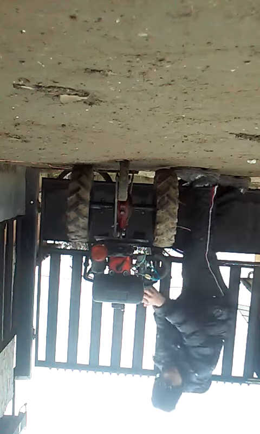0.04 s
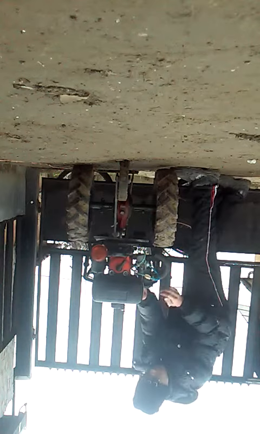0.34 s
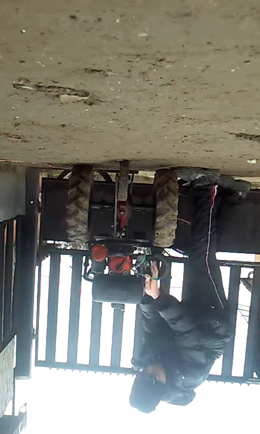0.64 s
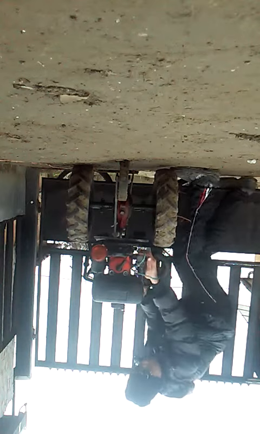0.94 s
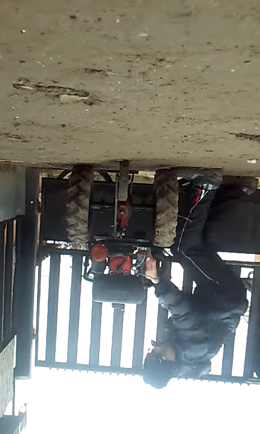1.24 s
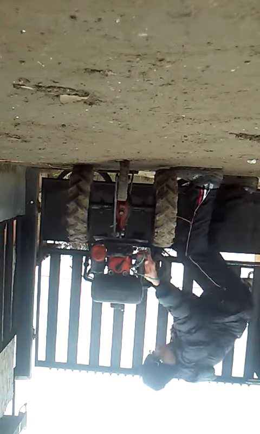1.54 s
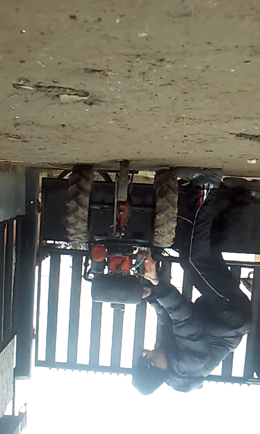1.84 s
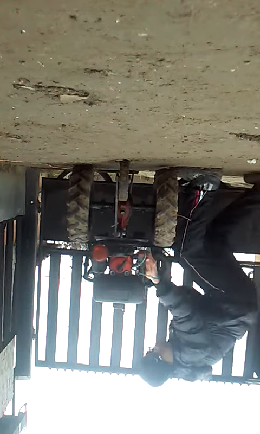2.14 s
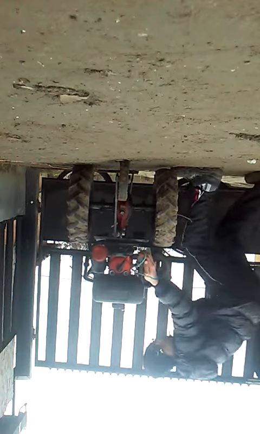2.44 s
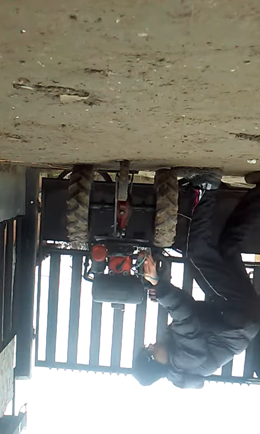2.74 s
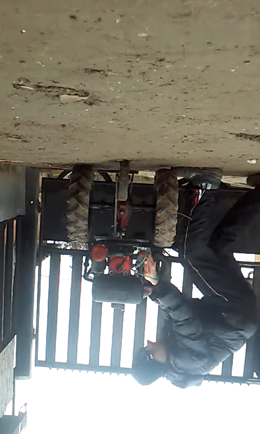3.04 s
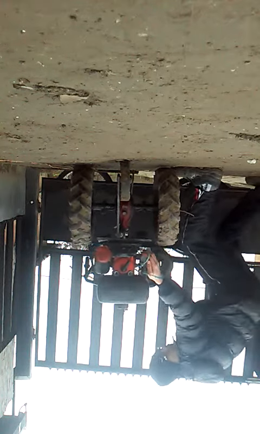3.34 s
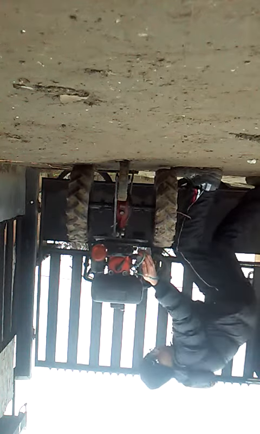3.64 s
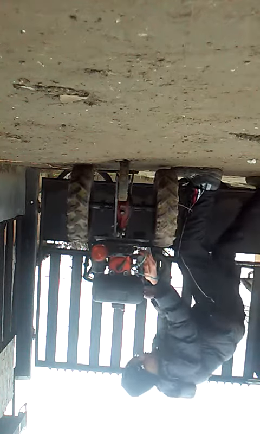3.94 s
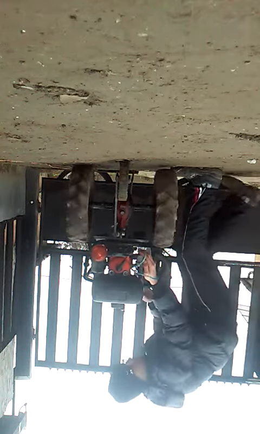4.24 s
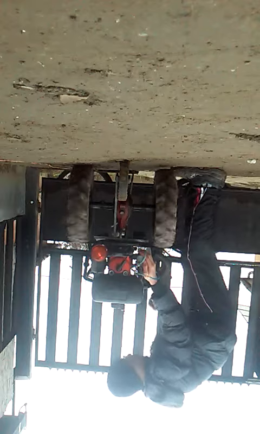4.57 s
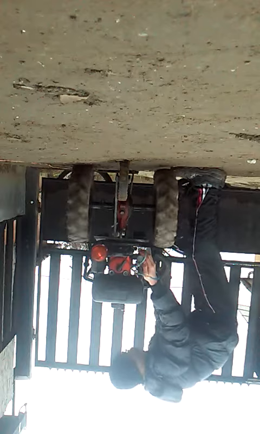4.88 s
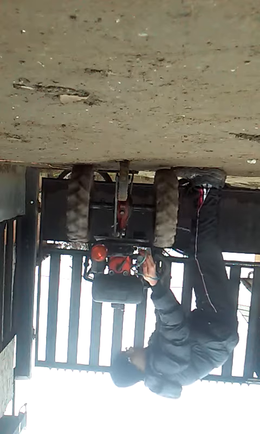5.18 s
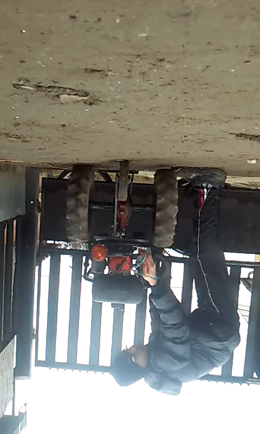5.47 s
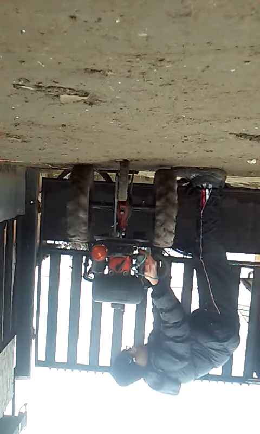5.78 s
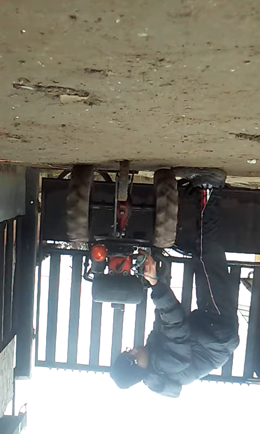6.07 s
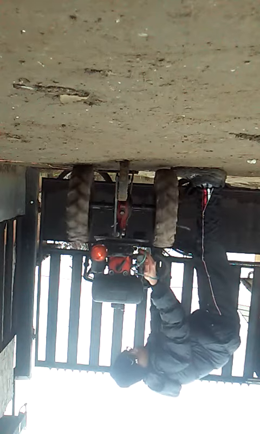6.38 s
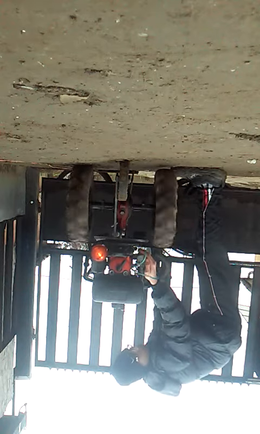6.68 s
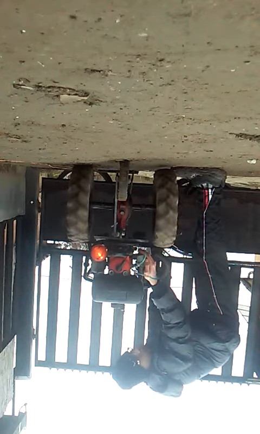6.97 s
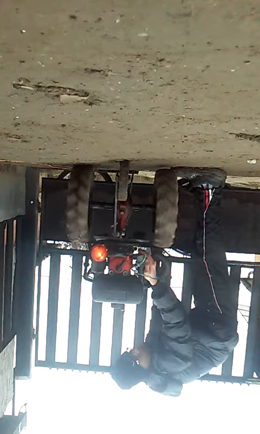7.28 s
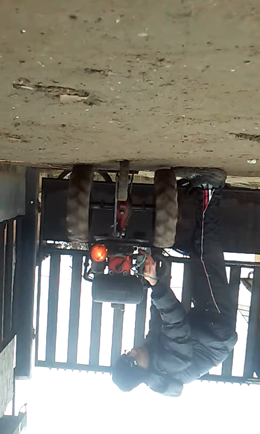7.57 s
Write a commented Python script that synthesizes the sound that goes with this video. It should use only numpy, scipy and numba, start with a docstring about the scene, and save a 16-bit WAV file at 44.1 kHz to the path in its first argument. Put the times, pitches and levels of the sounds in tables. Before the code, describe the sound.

A few metres away in a concrete yard, a small two-stroke tiller engine fires briefly and dies. The starter rope whirrs and scrapes through more pulls, with metal clanks but no firing. On the next pull the engine catches and gathers speed, puffing, knocking and rattling, with sharp, bright metallic cracks every few turns. Nearby walls add short reflections.

```python
"""In a concrete yard, a few metres away, a small two-stroke tiller engine is rope-started.
One burst of firings dies out; two more pulls only clank the starter over compression; on the next
it catches. It gathers speed; every few turns a sharp, bright metallic crack with a short clang sounds
over the puffing, knocking and rattling of the shaft turns. It knocks in surges, and booms and clatters
as it coasts. The walls add short reflections, and a limiter ducks the rest under the loud cracks."""
import sys
import numpy as np
from scipy import signal
from scipy.fft import rfft, irfft
from scipy.io import wavfile
from scipy.ndimage import uniform_filter1d, minimum_filter1d, map_coordinates
from numba import njit

SR = 44100
rng = np.random.default_rng(int(sys.argv[2]) if len(sys.argv) > 2 else 0)


def transcribe(u):
    """Save the signal u as a 16-bit wav file named by the first command-line argument.

    u: samples, shape (n,) or (channels, n), limited to [-1, 1]; the rate is SR.
    q: integer samples, one column per channel.
    """
    v = np.clip(np.atleast_2d(u).T, -1, 1)
    q = np.round(v * 32767).astype(np.int16)
    wavfile.write(sys.argv[1], SR, q)


N = 335821
TIME = np.arange(N) / SR
CAUGHT_S = 3.42

# metallic cracks once the engine has caught: (time [s], level [dB])
CRACKS = [(3.4478, -26), (3.5007, -34), (3.5679, -25.5), (3.674, -24.5), (3.72, -27.5), (3.7685, -28.5),
          (3.8496, -22.5), (3.9805, -22), (4.0661, -22), (4.1478, -22.5), (4.2276, -23.5), (4.349, -23.5),
          (4.4489, -31), (4.4933, -24), (4.5726, -21), (4.6522, -19), (4.7253, -19.5), (4.8738, -22.5),
          (5.0582, -20), (5.25, -18.5), (5.4487, -18.5), (5.6116, -17), (5.7336, -24), (5.8085, -18.5),
          (5.885, -23), (5.955, -21.5), (6.021, -23.5), (6.0855, -19), (6.1797, -21.5), (6.3857, -18),
          (6.448, -21), (6.505, -21.5), (6.565, -22), (6.6149, -24.5), (6.6656, -19), (6.7195, -24.5),
          (6.7659, -25), (6.8343, -22), (6.9286, -18), (7.0458, -19.5), (7.0913, -25), (7.1353, -24),
          (7.1797, -22), (7.224, -23.5), (7.2636, -19.5), (7.3043, -22.5), (7.3613, -19.5)]
# nominal shaft speed: (time [s], speed [turns/s])
SPEED = [(3.45, 17), (3.8, 23), (4.5, 25.4), (4.85, 27.6), (5.66, 24.2), (6.0, 30.3), (6.2, 33.3),
         (6.42, 32.4), (6.76, 42.6), (7.04, 42.4), (7.34, 51), (7.6, 49.2)]
# resonances of the starter housing: (frequency [Hz], width [Hz], lift [dB])
STARTER_MODES = [(730, 130, 2), (981, 120, 8.5), (1556, 57, 5.5), (1848, 150, 11), (2230, 89, 8),
                 (2415, 90, 5.5), (3406, 120, 5), (4720, 210, 8.5), (6780, 280, 9)]
# resonances and notches colouring the running engine, with a hollow near 1.4 kHz:
# (frequency [Hz], width [Hz], lift [dB])
ENGINE_MODES = [(939, 160, 5.5), (1414, 130, -19.5), (2380, 72, 5), (2770, 60, -8.5), (3190, 43, 10.5),
                (3730, 120, 2), (3690, 130, 4.5), (4690, 80, 5.5), (5100, 110, 1)]
# resonances and notches of the exhaust pipe: (frequency [Hz], width [Hz], lift [dB])
PIPE_MODES = [(90, 30, 6), (122, 20, -6), (205, 85, 8), (285, 40, -5)]
# response of the crankcase to a blow: (frequency [Hz], level [dB])
CRANKCASE_SPECTRUM = [(25, -34), (100, -7), (300, -11), (370, 1.5), (435, -2), (520, 1), (740, 4.5),
                      (1150, -15), (1450, -19), (2200, -8.5), (16000, -66)]


def undb(db):
    """Decibels to amplitude ratio."""
    return 10 ** (np.asarray(db) / 20)


def unit(x):
    """Normalise to rms 1."""
    return x / np.sqrt(np.mean(x ** 2))


def curve(table):
    """Linear interpolation of (time [s], value) rows."""
    rows = np.array(table, float)
    return np.interp(TIME, rows[:, 0], rows[:, 1])


def ramp(start, length):
    """Linear rise from 0 to 1."""
    return np.clip((TIME - start) / length, 0, 1)


def fade(start, db_per_s):
    """Unit gain until the start, then exponential decay."""
    return undb(-db_per_s * np.maximum(TIME - start, 0))


def add(track, s, sound):
    """Superpose a sound on the track at time s."""
    start = max(int(s * SR), 0)
    part = sound[:max(N - start, 0)]
    track[start:start + len(part)] += part


def colour(x, spectrum, modes=(), stretch=1):
    """Minimum-phase filter: Lorentzian peaks on a broad spectrum; stretch scales all frequencies."""
    size = 8192
    hz = np.maximum(np.arange(size // 2 + 1) * SR / size, 1) / stretch
    points = np.array(spectrum, float)
    db = np.interp(np.log(hz), np.log(points[:, 0]), points[:, 1])
    for centre, width, lift in modes:
        damped_width = max(width, centre / 45)
        db = db + lift / (1 + (2 * (hz - centre) / damped_width) ** 2)
    # folding the cepstrum makes the response causal
    cepstrum = irfft(np.log(undb(db)))
    cepstrum[1:size // 2] *= 2
    cepstrum[size // 2 + 1:] = 0
    return signal.oaconvolve(x, irfft(np.exp(rfft(cepstrum))))[:len(x)]


def burst(rise, hold, t60, tail_db, tail_t60):
    """Noise transient with a double decay: a fast fall and a weaker, slower tail (times in s)."""
    t = TIME[:SR // 3]
    shape = undb(-60 * np.maximum(t - hold, 0) / t60) + undb(tail_db - 60 * t / tail_t60)
    return rng.standard_normal(len(t)) * shape * (1 - np.exp(-t / rise))


def flutter(count):
    """Random amplitude modulation: the gain jumps every few milliseconds, now and then high."""
    steps = undb(2.5 * rng.exponential(size=count // 256 + 1))
    return unit(uniform_filter1d(steps.repeat(256)[:count], size=64))


def ping(hz, t60):
    """Damped vibration of struck metal: a main partial beats with a weaker close one."""
    t = TIME[:SR // 5]
    decay = undb(-60 * t / t60)
    twin_hz = hz * (1 + .015 * rng.standard_normal())
    note = np.sin(2 * np.pi * hz * t) + .5 * np.sin(2 * np.pi * twin_hz * t) * decay
    return note * decay * np.minimum(t / .003, 1)


def caught():
    """Crossfade: 0 while the engine is pulled over, 1 once it runs by itself."""
    return ramp(CAUGHT_S, 0.11)


def starter():
    """Friction and pumping: each tug whirrs the rope drum and makes the cold cylinder chuff."""
    # tugs on the rope: (start [s], let go [s], wound home [s], whirr [dB], chuff [dB])
    pulls = [(-0.3, 0.08, 0.11, -21, -25), (1.19, 1.45, 1.51, -31, -34), (1.418, 1.64, 1.725, -25.5, -30.5),
             (2.082, 2.545, 2.767, -26, -31), (3.141, 3.492, 3.77, -23.5, -30)]
    # rope and handle scraping: (time [s], length [s], level [dB])
    scrapes = [(1.258, 0.25, -35.5), (1.776, 0.045, -20), (2.081, 0.11, -53.5), (2.163, 0.063, -28),
               (2.871, 0.036, -21), (2.924, 0.083, -42.5), (3.237, 0.04, -25.5)]
    # friction noise of the rope: (frequency [Hz], level [dB])
    rope_spectrum = [(100, -33.5), (700, 6.5), (1400, -2.5), (2200, 2), (7000, -6), (11000, -9.5),
                     (16000, -20)]
    # breathy exhaust of the cold cylinder: (frequency [Hz], level [dB])
    chuff_spectrum = [(20, -29.5), (55, -3.5), (130, -2), (240, -0.5), (420, -4.5), (1200, -47)]
    drum, cylinder = np.zeros(N), np.zeros(N)
    for start, let_go, home, whirr_db, chuff_db in pulls:
        spin = ramp(start, 0.25)
        # the spring winds the rope in ever faster, then the drum stops
        rewound_s = np.clip(TIME, let_go, home) - let_go
        rewind = undb(38 * rewound_s) * fade(home, db_per_s=225.5)
        pawl_drag = undb(-13) * fade(let_go, db_per_s=46.5)
        drum = np.hypot(drum, undb(whirr_db) * spin ** 2 * np.maximum(rewind, pawl_drag))
        cylinder = np.hypot(cylinder, undb(chuff_db) * spin ** 4 * fade(let_go, db_per_s=73))
    for s, length, db in scrapes:
        drum += undb(db) * np.interp(TIME - s, [0, .002, length, length + 0.031], [0, 1, 1, 0])
    spring_chatter = flutter(N)
    # rubbing excites the resonances less than a blow does
    rubbed_modes = [(hz, width, lift * 0.7) for hz, width, lift in STARTER_MODES]
    whirr = unit(colour(rng.standard_normal(N) * spring_chatter, rope_spectrum, rubbed_modes)) * drum
    chuff = unit(colour(rng.standard_normal(N), chuff_spectrum, PIPE_MODES)) * cylinder
    return whirr + chuff * (1 - caught())


def clanks():
    """Impact excitation: pawls and flywheel clank at compression; the mode struck hardest rings on."""
    # blows: (time [s], level [dB], extra body [dB], extra crack [dB], frequency struck hardest [Hz])
    blows = [(0.0176, -13.5, 2.5, -5, 730), (0.0632, -10, -11, -6.5, 2910), (0.0934, -10, -8, -9, 730),
             (0.1111, -8.5, -3.5, -15, 730), (0.1597, -13.5, -23, -8.5, 6750),
             (0.2116, -14.5, -6.5, -9, 730), (0.243, -14.5, -7.5, -16, 730), (0.2799, -15.5, -16, -7, 3406),
             (0.32, -32, -8, -11, 2230), (0.3625, -15, -4.5, -18, 1850), (0.4248, -20, -11, -30, 1540),
             (0.4938, -25, -23.5, -10, 3406), (0.5715, -20, -11, -25, 1540), (0.679, -29, -21.5, -25, 2320),
             (1.3323, -3.5, -5, -11, 981), (1.4284, -19, 3.5, -3, 730), (1.5886, -14, -6, -7, 730),
             (1.6544, -14.5, 0.5, -13, 730), (1.6825, -8, -10.5, -14.5, 730), (1.789, -16.5, -1, -4.5, 981),
             (1.8674, -24.5, -7.5, -14, 2300), (1.9265, -32.5, -21, -10.5, 1540),
             (2.2, -2.5, -7.5, -18, 730), (2.298, -3, -10, -15.5, 1850), (2.4116, -7.5, -4.5, -10.5, 4690),
             (2.5, -12.5, -4.5, -11, 730), (2.611, -14, -7.5, -13, 730), (2.6618, -9.5, -11, -19, 1850),
             (2.6852, -5, -7.5, -11.5, 4690), (2.736, -23, -19, 1, 4690),
             (2.7666, -11.5, -10.5, -10.5, 2350), (2.814, -16.5, -11.5, -35, 1540),
             (2.8824, -33.5, -8, 13, 2330), (2.964, -29, -6.5, -38, 1530), (3.127, -48, -30, -4, 3406),
             (3.274, -2.5, -4.5, -13.5, 981), (3.3382, -9.5, -4, -35, 981), (3.3634, -16.5, 2, -4.5, 6750),
             (3.525, -12, 4, -7, 981)]
    # low, middle and high parts of a clank: (frequency [Hz], level [dB])
    body_spectrum = [(100, -24), (330, -10), (480, -4), (700, 5.5), (1000, -1), (2500, -35.5)]
    ring_spectrum = [(600, -21.5), (1600, 1), (2400, 2), (4500, -9), (8000, -32.5)]
    crack_spectrum = [(1500, -52.5), (3000, -5), (4500, 1), (10500, -8), (16000, -26.5)]
    out = np.zeros(N)
    for s, db, body_db, crack_db, struck_hz in blows:
        main_hz, main_width, _ = min(STARTER_MODES, key=lambda mode: abs(mode[0] - struck_hz))
        # every mode takes a random share of its lift, the main one 1 dB more
        modes = [(hz, width, lift * 0.83 * rng.uniform(0.3, 1.44) + (hz == main_hz))
                 for hz, width, lift in STARTER_MODES]
        body = burst(rise=0.0012, hold=0.003, t60=0.075, tail_db=-10.5, tail_t60=0.3)
        ring = burst(rise=0.0022, hold=0.00093, t60=0.12, tail_db=-25, tail_t60=0.31)
        crack = burst(rise=0.0028, hold=0.009, t60=0.059, tail_db=-16, tail_t60=0.15)
        clank = (undb(10 + body_db) * colour(body, body_spectrum, modes)
                 + undb(1) * colour(ring, ring_spectrum, modes)
                 + undb(8 + crack_db) * colour(crack, crack_spectrum, modes))
        add(out, s, undb(db) * clank)
        damping = main_width / 100  # a narrower mode rings softer and longer
        add(out, s, undb(db - 6) * np.sqrt(damping) * ping(main_hz, t60=0.1 / damping))
    return out


def thuds():
    """Impulse response: the first few firings thump through crankcase and exhaust pipe."""
    # firings of the burst that dies out: (time [s], level [dB])
    first_firings = [(0.019, -15), (0.078, -15), (0.098, -11.5), (0.114, -13)]
    thud = colour(signal.unit_impulse(SR // 8), CRANKCASE_SPECTRUM, PIPE_MODES)
    out = np.zeros(N)
    for s, db in first_firings:
        add(out, s, undb(db + 33.5) * thud)
    return out


def shaft(sag_per_s=13, flywheel_s=0.3):
    """Inertia and friction: the speed jumps at each crack, then sags. Gives the angle in turns."""
    crack_s = np.array(CRACKS)[:, 0]
    edges = np.r_[0, crack_s, TIME[-1]]
    midpoint = ((edges[:-1] + edges[1:]) / 2)[np.searchsorted(crack_s, TIME)]
    speed = curve(SPEED) - sag_per_s * (TIME - midpoint) * (TIME > crack_s[0])
    travelled = np.cumsum(speed) / SR
    # a smooth slip keeps the cracks about a whole number of turns apart
    at_crack = np.interp(crack_s, TIME, travelled)
    whole_turns = np.cumsum(np.r_[0, np.maximum(np.round(np.diff(at_crack)), 1)])
    slip = np.interp(travelled, at_crack, whole_turns - at_crack)
    return np.maximum(travelled + uniform_filter1d(slip, size=int(flywheel_s * SR)), 0)


def shaft_noise(turns, memory=0.72):
    """Quasi-periodic noise: each turn nearly repeats the last, so the overtones follow the speed."""
    points = 512
    fresh = rng.standard_normal((int(turns[-1]) + 2, points))
    pattern = signal.lfilter([1], [1, -memory], fresh, axis=0).ravel()
    return unit(map_coordinates(pattern, [turns * points], order=1))


def casing_rattle(turns, shake):
    """Forced vibration: the casing buzzes after each puff."""
    # buzz of the casing: (frequency [Hz], level [dB])
    rattle_spectrum = [(30, -53), (300, -3), (1000, 6.5), (1250, 9.5), (1650, 6), (2700, -10), (3700, -4),
                       (7000, -40)]
    return unit(colour(shaft_noise(turns) * shake ** 0.2, rattle_spectrum, ENGINE_MODES))


def air_hiss(shake):
    """Flow noise: air hisses through carburettor and fan, pulsing slightly with each turn."""
    # rushing air: (frequency [Hz], level [dB])
    hiss_spectrum = [(30, -33), (1450, 4), (2400, 4), (3700, 1), (6000, -0.5), (7800, -9.5), (10500, -9),
                     (16000, -26)]
    flow = rng.standard_normal(N) * shake ** 0.09 * np.sqrt(flutter(N))
    return unit(colour(flow, hiss_spectrum, ENGINE_MODES))


def tin_clatter(shake, scatter_db=4):
    """Random impacts: loose tinware is tapped, mostly after each puff, each time in a new modal mix."""
    # modes of the loose guards and tank: (frequency [Hz], t60 [s], level [dB])
    tin_modes = [(1638, 0.025, -8), (1835, 0.05, -6), (2233, 0.032, -1.5), (2425, 0.034, -0.5),
                 (2906, 0.018, -6), (3510, 0.01, -3.5)]
    speed = curve(SPEED)
    taps_per_s = 5 * speed * shake
    at = np.flatnonzero(rng.random(N) < taps_per_s / SR)
    strength = undb(scatter_db * np.clip(rng.standard_normal(len(at)), -2, 2)) / np.sqrt(speed[at])
    out = np.zeros(N)
    for hz, t60, db in tin_modes:
        taps = np.zeros(N)
        taps[at] = strength * rng.uniform(-1.18, 1, len(at))
        out += undb(db) * unit(signal.oaconvolve(taps, ping(hz, t60))[:N])
    return unit(out)


def clang(excitation, scatter_db=5):
    """Driven resonance: a burst rings metal modes with its own energy; the higher ones die sooner."""
    # high modes of the ringing metal: (frequency [Hz])
    clang_modes = [2935, 3253, 3650, 3960, 4760, 5070, 5755, 6190, 6930, 9180, 10570]
    chance = rng.standard_normal((len(clang_modes), 2))
    notes = sum(undb(scatter_db * loud) * ping(hz * (1 + detune / 100), t60=0.12 * clang_modes[0] / hz)
                for hz, (loud, detune) in zip(clang_modes, chance))
    ring = signal.oaconvolve(excitation, notes)[:len(excitation)]
    return ring * np.linalg.norm(excitation) / np.linalg.norm(ring)


def metallic_cracks(length_scatter_db=3.5, stretch_per_db=0.015):
    """Transient excitation: every few turns a sharp crack, brighter when strong, with a short clang."""
    # bright metallic crack: (frequency [Hz], level [dB])
    crack_spectrum = [(1000, -41.5), (2500, 5), (3100, 10.5), (5400, 17.5), (7500, 12), (10500, 17.5),
                      (16000, -1)]
    out, speed = np.zeros(N), curve(SPEED)
    typical_db = np.median(np.array(CRACKS)[:, 1])
    for s, db in CRACKS:
        length = undb(length_scatter_db * rng.uniform(-1.06, 1))
        excitation = burst(rise=0.00036 * length ** 4, hold=0.014 * length, t60=0.036 * length,
                           tail_db=-1.5, tail_t60=0.067)
        speed_ratio = np.interp(s, TIME, speed) / np.median(speed)
        stretch = speed_ratio ** 0.021 * (1 + stretch_per_db * (db - typical_db))
        crack = colour(excitation * flutter(len(excitation)), crack_spectrum, ENGINE_MODES, stretch)
        add(out, s, undb(db) * crack)
        add(out, s, undb(db + 9.5) * clang(excitation))
    return out


def since_crack():
    """Seconds since the latest metallic crack, negative before the first."""
    crack_s = np.array(CRACKS)[:, 0]
    return TIME - crack_s[np.maximum(np.searchsorted(crack_s, TIME) - 1, 0)]


def strokes(turns, angle, scatter_db, jitter_s):
    """Pulse train: one pulse a turn at a given shaft angle, scattered in size and timing."""
    times = np.interp(np.arange(int(turns[-1])) + angle, turns, TIME)
    lateness, size = rng.standard_normal((len(times), 2)).T
    at = np.clip((times + jitter_s * lateness) * SR, 0, N - 1).astype(int)
    pulses = np.zeros(N)
    pulses[at] = undb(scatter_db * size)
    return pulses / np.sqrt(curve(SPEED))


def turbulent(pulses, turns, eddy_db, t60):
    """Turbulence: every pulse drags a short, decaying wake of eddies."""
    decay = undb(-60 * TIME[:SR // 8] / t60)
    wakes = signal.oaconvolve(pulses, decay / np.linalg.norm(decay))[:N]
    return pulses + undb(eddy_db) * wakes * shaft_noise(turns)


def exhaust_puffs(turns, port):
    """Pipe resonance: each turn sends a puff through the exhaust, answered by a gulp of the intake."""
    # puff of the running engine: (frequency [Hz], level [dB])
    puff_spectrum = [(20, -48), (50, -11), (82, -4), (125, -2.5), (230, -5.5), (400, -8.5), (1200, -45),
                     (8000, -80)]
    intake = strokes(turns, angle=.2, scatter_db=3, jitter_s=.0003)
    recovery = np.interp(since_crack(), [0, 0.036], [.3, 1])  # a puff just after a crack is weak
    flow = turbulent((port + intake / 2) * recovery, turns, eddy_db=-12, t60=.12)
    return unit(colour(flow, puff_spectrum, PIPE_MODES))


def crankcase_knock(turns, attack_s=0.011, release_s=0.078):
    """Structure-borne sound: slaps at both ends of the stroke knock the crankcase, harder under load."""
    # spells in which the engine pulls hard: (start [s], end [s], lift [dB])
    surges = [(3.505, 3.695, 3), (3.933, 4.144, 3), (4.476, 4.656, 5), (5.536, 6.047, 8), (6.349, 6.474, 7),
              (6.538, 6.674, 9), (7.015, 7.27, 6)]
    slaps = (strokes(turns, angle=.87, scatter_db=2.3, jitter_s=.00007)
             + strokes(turns, angle=.48, scatter_db=2.3, jitter_s=.0001))
    knock = colour(turbulent(-slaps, turns, eddy_db=-10.5, t60=.08), CRANKCASE_SPECTRUM)
    lifts_db = [db * (ramp(start, attack_s) - ramp(end, release_s)) for start, end, db in surges]
    return unit(knock) * undb(np.max(lifts_db, axis=0))


def silencer_boom(turns, port):
    """Cavity resonance: the exhaust pulses make the silencer boom."""
    # broad response of the silencer: (frequency [Hz], level [dB])
    boom_spectrum = [(50, -40), (140, -14), (230, 2), (310, -20), (420, -15), (1100, -12), (8000, -90)]
    # its resonance: (frequency [Hz], width [Hz], lift [dB])
    boom_mode = [(232, 70, 9)]
    return unit(colour(turbulent(port, turns, eddy_db=-8, t60=.1), boom_spectrum, boom_mode))


def running_engine():
    """Periodic excitation: one shaft times every part; fast coasting brings out boom and clatter."""
    turns, speed = shaft(), curve(SPEED)
    # 0 just after a crack, 1 once the shaft has spun on fast for a while without one
    coast = np.clip((since_crack() - 0.0026) / 0.081, 0, 1) * np.interp(speed, [22.4, 33], [0, 1])
    drive = coast * speed / speed.max()
    port = strokes(turns, angle=.9, scatter_db=2.5, jitter_s=.00015)
    shake = np.exp(np.cos(2 * np.pi * (turns - .35))) * caught()  # peaks after each puff
    warm_up = ramp(CAUGHT_S, 0.56)
    return (exhaust_puffs(turns, port) * undb(-25.75 + 0.5 * warm_up)
            + silencer_boom(turns, port) * undb(-22.5) * drive
            + crankcase_knock(turns) * undb(-22.5)
            + casing_rattle(turns, shake) * undb(-22)
            + air_hiss(shake) * undb(-22.5)
            + tin_clatter(shake) * undb(-23.5 + 9 * drive * coast))


def walls(x, wet_db, t60):
    """Reverberation: the direct sound plus dense reflections from ground, gate and walls."""
    t = TIME[:SR // 2]
    echoes = rng.standard_normal(len(t)) * undb(-60 * t / t60) * (t > .003)
    return x + undb(wet_db) * signal.oaconvolve(x, echoes / np.linalg.norm(echoes))[:N]


def scene():
    """Superposition: starter, engine and their reflections over the yard's faint rumble."""
    # background noise: (frequency [Hz], level [dB])
    yard_spectrum = [(20, -19), (55, -3.5), (400, -40.5), (15000, -34)]
    yard = unit(colour(rng.standard_normal(N), yard_spectrum)) * undb(-65.5)
    machine = clanks() + thuds() + starter() + metallic_cracks() + running_engine()
    return (walls(machine, wet_db=-10.5, t60=0.16) + yard)[None]


@njit
def recover(allowed, release):
    """Exponential release: the gain falls at once and creeps back towards 1."""
    out, gain = np.empty(len(allowed)), 1.
    for i in range(len(allowed)):
        gain = min(allowed[i], gain + (1 - gain) * release)
        out[i] = gain
    return out


def record(dry, ceiling_db=-0.7, release_s=0.018, top_hz=15800):
    """Peak limiting: a look-ahead gain holds the peaks, then a low-pass cuts the top."""
    allowed = np.minimum(1, undb(ceiling_db) / (np.abs(dry[0]) + 1e-9))
    ahead = minimum_filter1d(allowed, size=45)
    gain = uniform_filter1d(recover(ahead, 1 / (release_s * SR)), size=45)
    return signal.sosfilt(signal.ellip(10, .1, 80, top_hz, fs=SR, output="sos"), dry * gain)


dry = scene()
out = record(dry)
transcribe(out)
```